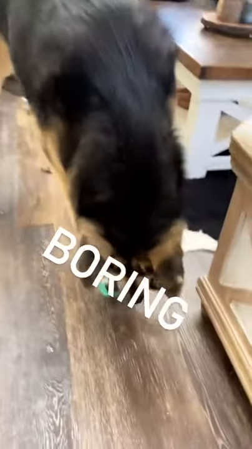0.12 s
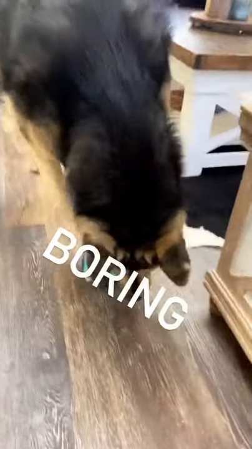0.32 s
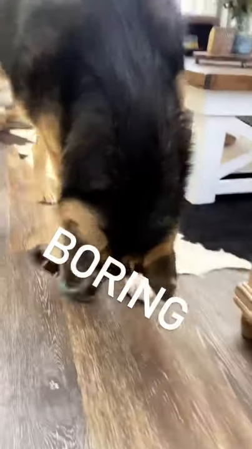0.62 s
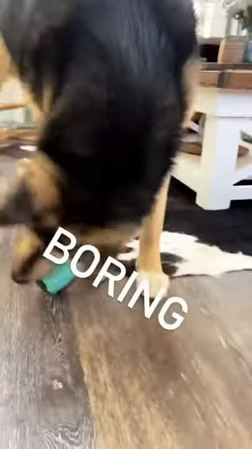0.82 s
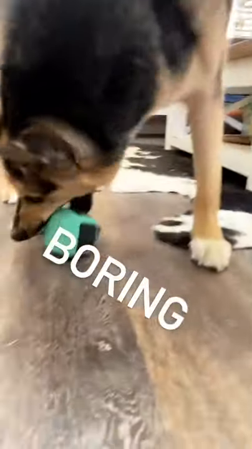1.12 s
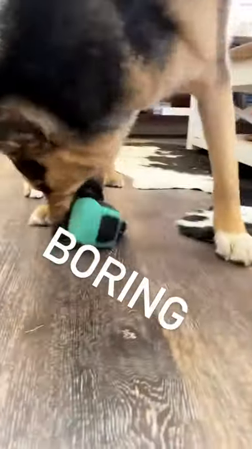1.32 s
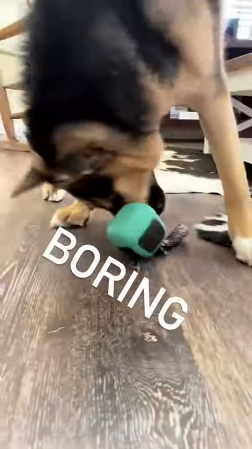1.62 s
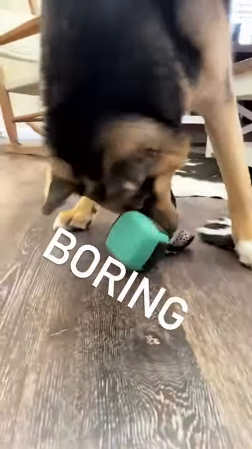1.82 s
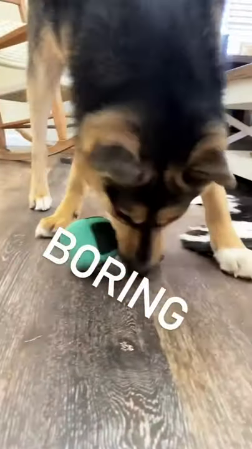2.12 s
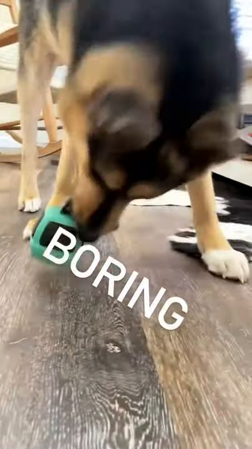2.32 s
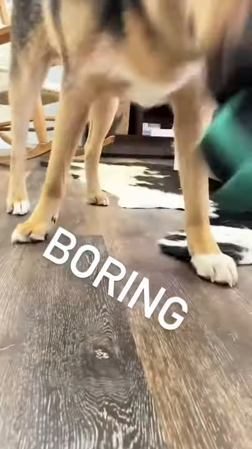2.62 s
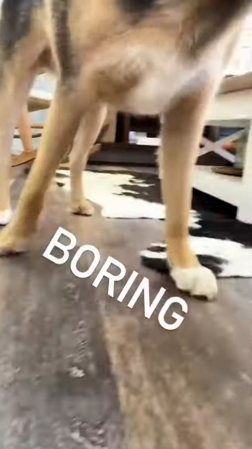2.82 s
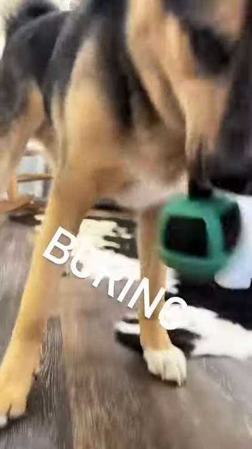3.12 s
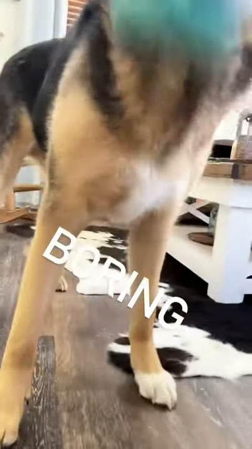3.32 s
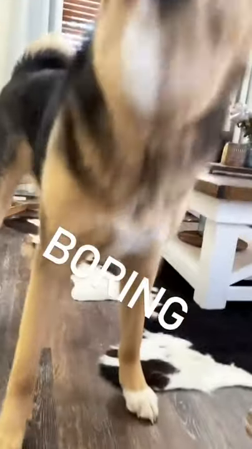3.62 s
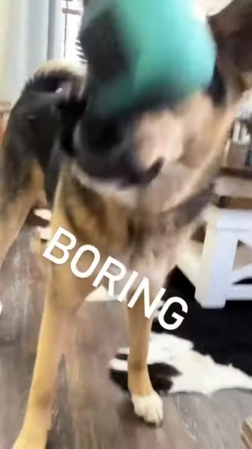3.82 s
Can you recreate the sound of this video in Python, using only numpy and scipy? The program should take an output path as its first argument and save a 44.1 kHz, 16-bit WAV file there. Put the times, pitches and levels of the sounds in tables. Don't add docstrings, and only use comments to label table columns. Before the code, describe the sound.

Hard ticks of a dog's ball and claws on floorboards, low paw thuds, sniffs and breathy pants

```python
import sys
import numpy as np
from scipy import signal
from scipy.fft import rfft, irfft
from scipy.io import wavfile
from scipy.ndimage import uniform_filter1d, map_coordinates

SR = 44100
rng = np.random.default_rng(int(sys.argv[2]) if len(sys.argv) > 2 else 0)


def put_to_file(sound):
    columns = np.atleast_2d(sound).T
    safe = np.clip(columns, -1, 1)
    whole_steps = np.round(safe * 32767)
    wavfile.write(sys.argv[1], SR, whole_steps.astype(np.int16))


def boost(x):
    u = np.asarray(x, float) / 20
    return 10 ** u


N = 174195


def unit(x):
    return x / np.sqrt(np.mean(x ** 2))


def peak(x):
    return x / np.abs(x).max()


def colour(points):
    f = np.maximum(np.fft.rfftfreq(N, 1 / SR), 1)
    p = np.array(points, float)
    db = np.interp(np.log(f), np.log(p[:, 0]), p[:, 1])
    db = db - 24 * np.maximum(np.log2(p[0, 0] / f), 0)
    return unit(irfft(rfft(rng.standard_normal(N)) * boost(db), N))


def ring(x, hz, width_hz):
    return signal.lfilter(*signal.iirpeak(hz, hz / width_hz, fs=SR), x)


def ring_twice(x, hz, width_hz):
    return ring(ring(x, hz, width_hz), hz, width_hz)


def decay(t, t60_s):
    return 1000. ** (-t / t60_s)


def walk(rate_hz):
    hold = int(SR / rate_hz)
    steps = np.repeat(rng.standard_normal(N // hold + 1), hold)
    return unit(uniform_filter1d(uniform_filter1d(steps, hold), hold)[:N])


def swell(start_s, rise_s, fall_s, level_db):
    t = np.arange(N) / SR - start_s
    up = np.clip(t / max(rise_s, 1e-3), 0, 1)
    down = np.clip(1 - (t - rise_s) / max(fall_s, 1e-3), 0, 1)
    return boost(level_db) * (np.sin(np.pi / 2 * up) * np.sin(np.pi / 2 * down)) ** 2.2


def rush(rows, points, grain_db, grain_hz):
    return sum(swell(*row) for row in rows) * colour(points) * boost(grain_db * walk(grain_hz))


def add(out, start_s, x):
    i = max(int(start_s * SR), 0)
    out[i:i + len(x)] += x[:N - i]


def hum():
    # centre_hz, width_hz, level_db
    rumble = [(50.3, 8, -66), (88.8, 26, -58), (155.8, 17.7, -59.5), (174.2, 19, -63.5)]
    mains_hz = 50 * (1 + 0.0044 * walk(0.98))
    line = np.sqrt(2) * np.sin(2 * np.pi * np.cumsum(mains_hz) / SR)
    out = boost(-49.5 + 1.2 * walk(3)) * line
    for hz, width_hz, db in rumble:
        out = out + boost(db) * unit(ring_twice(rng.standard_normal(N), hz, width_hz))
    return out


def room_air():
    # freq_hz, level_db
    air_curve = [(28, -4.5), (70, 5.5), (200, -1.5), (400, -16), (1200, -39), (3000, -47), (7000, -53),
                 (13000, -54)]
    return boost(-56 + 3 * walk(4.3)) * colour(air_curve)


def side_air():
    # freq_hz, level_db
    side_curve = [(36, -26), (65, -3), (160, -1), (250, -11), (500, -24), (1200, -44), (4000, -42),
                  (13000, -46)]
    return boost(-60.5) * colour(side_curve)


def port_hiss():
    # freq_hz, level_db
    hiss_curve = [(7000, -9.5), (10000, -9.5), (11500, -6), (13000, -7)]
    return boost(-88 + 4 * walk(27)) * colour(hiss_curve)


def coat():
    # time_s, level_db
    stir = [(0, -59.5), (.2, -68.5), (.35, -54), (.52, -61.5), (.9, -59), (1.2, -61.5), (1.5, -83),
            (1.62, -80), (1.902, -77), (2.1, -58.5), (2.3, -78.5), (2.58, -76.5), (2.649, -99.5),
            (2.751, -69), (3.05, -62), (3.348, -56), (3.8, -67.5), (3.95, -69)]
    # freq_hz, level_db
    fur_curve = [(200, 5.5), (450, 3.5), (1000, -6), (2400, -4.5), (4500, -6), (6500, -11.5), (9000, -18.5),
                 (13000, -38)]
    # freq_hz, level_db
    hair_curve = [(5000, -9.5), (7500, -7), (10000, 17), (13000, -7)]
    stir_db = np.interp(np.arange(N) / SR, *np.array(stir).T)
    hair_db = -78 + 0.6 * (stir_db - stir_db.mean()) + 5.0 * walk(6.99)
    rustle = boost(stir_db + 2.37 * walk(22)) * colour(fur_curve)
    return rustle + boost(hair_db) * colour(hair_curve)


def scrapes():
    # start_s, rise_s, fall_s, level_db
    drags = [(.0, 0.03, 0.47, -68), (.40, 0.0047, 0.13, -60), (.82, 0.026, 0.048, -42.5),
             (.865, 0.034, 0.045, -48), (1.25, 0.056, 0.42, -68), (1.38, 0.15, 0.12, -78),
             (1.75, 0.04, 0.085, -67), (1.925, 0.016, 0.24, -72), (2.47, 0.046, 0.066, -59.5),
             (2.93, 0.0021, 0.069, -47.5), (2.395, .012, 0.018, -66), (3.12, .04, .1, -63.5),
             (3.31, 0.049, 0.062, -63), (3.43, 0.032, 0.073, -60), (3.86, 0.019, 0.1, -66)]
    # freq_hz, level_db
    drag_curve = [(300, -14), (1100, -2), (2500, -4), (5800, 0), (8000, -4), (10500, -5), (13000, -13)]
    return rush(drags, drag_curve, grain_db=2.5, grain_hz=140)


def ticks():
    # start_s, level_db, ring_hz, contact_s, crack_db (re ring)
    nosing = [(.205, -47, 590, 0.014, -18), (0.218, -41, 500, 0.0087, -16), (0.2668, -23, 1210, 0.0027, -8),
              (0.2683, -29.5, 1100, 0.005, -29), (0.2915, -32.5, 5450, 0.0018, 4.5),
              (0.2921, -30, 1900, 0.002, 9), (.548, -43, 380, .01, -30), (.592, -39.5, 560, 0.0089, -4),
              (0.617, -47.5, 480, 0.0043, -23), (0.9711, -28.5, 2600, 0.0042, -4),
              (0.9722, -34.5, 4840, 0.006, -13), (0.994, -20, 6240, 0.0022, -20.5),
              (0.9965, -25, 5600, 0.0029, -7), (1.002, -21.5, 2900, .004, -10),
              (1.0153, -28, 3600, .002, 3.5), (0.9996, -20, 4300, 0.0036, -1.5),
              (1.0055, -14.5, 5900, 0.0079, -15.5), (1.007, -31, 1514, 0.007, -19),
              (1.01, -23.5, 3900, 0.0021, -2.5), (1.240, -44, 443, 0.0051, -6),
              (1.267, -46, 1580, 0.0091, -8), (1.288, -52, 930, 0.018, -21), (1.566, -55.5, 700, 0.009, -9),
              (1.944, -53.5, 870, 0.0084, -0.5)]
    # start_s, level_db, ring_hz, contact_s, crack_db (re ring)
    swinging = [(2.061, -44, 2140, 0.006, -13), (2.073, -40, 1400, .004, -7), (2.100, -55, 5700, .004, -15),
                (2.126, -32.5, 885, 0.0089, -24), (2.131, -35.5, 1480, 0.0054, -23),
                (2.168, -37, 1410, .003, -14), (2.182, -40, 3620, 0.0022, -21),
                (2.702, -49, 1310, 0.0059, -19), (2.720, -46, 1346, 0.0086, -24),
                (2.753, -49, 1360, .005, -18), (2.765, -40, 1120, 0.0044, -21),
                (2.149, -34.5, 1167, 0.01, -21), (2.408, -39.5, 2010, 0.0036, -10),
                (2.512, -46, 503, 0.005, 8), (2.576, -50.5, 4220, 0.0044, 5.5),
                (2.622, -64, 6060, 0.0026, 2), (2.767, -35, 5800, .008, 1.5),
                (2.927, -32, 5150, 0.0079, -10), (2.9286, -26.5, 6020, 0.0044, 1.5),
                (3.316, -38, 2220, 0.004, -14), (3.334, -37.5, 700, 0.0067, -20),
                (3.362, -31, 990, 0.0089, -14), (3.373, -45, 800, .004, -20),
                (3.385, -40, 1410, 0.0019, -25), (3.454, -47, 850, 0.0033, 1),
                (3.585, -41.5, 334, 0.015, -33)]
    ring_q, overtone_ratio, overtone_db = 2.1, 1.9, -6
    crack_low_hz, crack_top_hz = 1100, 8500
    knock_hz, knock_width_hz = 600, 700
    strike_db = 5

    rows = [*nosing, *swinging]
    out, t = np.zeros(N), np.arange(2048) / SR
    crack_band = signal.butter(2, [crack_low_hz, crack_top_hz], "band", fs=SR)
    chatter = rng.standard_normal((len(rows), 2048))
    for (start_s, db, hz, contact_s, crack_db), rough in zip(rows, chatter):
        burst = rough * np.exp(-2.2 * (t / contact_s) ** 2) * np.minimum(t / (0.18 * contact_s), 1)
        burst[8:11] += boost(strike_db) * np.sign(rough[0])

        overtone_hz = min(overtone_ratio * hz, 0.7 * crack_top_hz)
        body = peak(ring_twice(burst, hz, hz / ring_q))
        body = body + boost(overtone_db) * peak(ring_twice(burst, overtone_hz, overtone_hz / ring_q))
        crack = peak(signal.lfilter(*crack_band, burst))
        knock = peak(ring_twice(burst, knock_hz, knock_width_hz))
        knock_db = -4 - 11 * abs(np.log2(hz / 1200))
        add(out, start_s, boost(db) * (peak(body) + boost(crack_db) * crack + boost(knock_db) * knock))
    return out


def thuds():
    # start_s, level_db, push_s
    pushes = [(0.221, -35, 0.0013), (.27, -34, 0.0096), (.49, -33.5, 0.011), (0.596, -31.5, 0.0014),
              (0.643, -36.5, 0.0088), (.915, -27, 0.0052), (1.021, -32, 0.0089), (1.07, -37.5, 0.0045),
              (1.245, -36, 0.0035), (1.292, -34, 0.0084), (1.919, -40, .004), (2.932, -34.5, 0.0017),
              (3.10, -42, 0.0067), (3.348, -40, 0.0029), (3.641, -38.5, 0.0086)]
    # freq_hz, level_db, t60_s
    boards = [(57.4, 8.5, 0.23), (98.6, 3.5, 0.29), (122.5, 6, 0.25), (152.8, 10, 0.3), (203.7, -2.5, 0.36),
              (285.7, -3, 0.24), (350, -30, .08)]
    mix_spread_db, pitch_spread = 6.4, 0.074
    out, t = np.zeros(N), np.arange(SR // 2) / SR
    spots = rng.standard_normal((len(pushes), 2, len(boards)))
    for (start_s, db, push_s), (mix, detune) in zip(pushes, spots):
        modes = np.zeros(len(t))
        for (hz, mode_db, t60_s), m, d in zip(boards, mix, detune):
            tone = np.sin(2 * np.pi * hz * (1 + pitch_spread * d) * t)
            modes += boost(mode_db + mix_spread_db * m) * tone * decay(t, t60_s)
        hit = signal.fftconvolve(modes, np.hanning(int(push_s * SR) + 3))
        add(out, start_s, boost(db) * peak(hit))
    return out


def sniffs():
    # start_s, rise_s, fall_s, level_db
    draws = [
        (.30, 0.011, 1, -68.5),
        (.50, 0.2, 0.53, -56),
        (.992, 0.0072, 0.031, -32.5),
        (1.01, 0.011, 0.22, -52),
        (3.20, 0.37, 0.37, -53),
    ]
    # freq_hz, level_db
    nose_curve = [(300, -10), (1400, -10.5), (2200, 2.5), (3300, 3.5), (4800, 1), (6500, -8.5), (9000, -32),
                  (13000, -25)]
    return rush(draws, nose_curve, grain_db=1.5, grain_hz=39.75)


def pants():
    # start_s, rise_s, fall_s, level_db, tilt_db_per_octave
    breaths = [
        (.30, 0.015, 0.21, -55, 6.5),
        (.76, 0.019, 0.068, -62, 0),
        (2.018, 0.13, 0.12, -48, 2.4),
        (2.03, 0.022, .09, -61.5, 6.5),
        (2.17, 0.059, .14, -58.5, -0.5),
        (.83, .03, 0.074, -54.5, 0.5),
        (2.50, 0.082, 0.085, -68.5, -0.5),
        (2.671, 0.054, 0.09, -51, 1.5),
        (2.719, 0.048, .07, -52, 3),
        (2.84, 0.043, 0.21, -59.5, 0),
    ]
    # centre_hz, width_hz, level_db
    throat = [(277, 26, -3.5), (414, 25, -0.5), (700, 240, -1), (1060, 130, -2), (1300, 84, -2.5),
              (2010, 490, -3.5), (2660, 730, -4.5), (3170, 1330, -7), (6200, 1800, -13)]
    breath = rng.standard_normal(N) * boost(2.5 * walk(300))
    breath = signal.lfilter(*signal.butter(4, 7000, fs=SR), breath)
    bands = []
    for k, (hz, width_hz, db) in enumerate(throat):
        gain = (-1) ** k * boost(db + 3.2 * walk(40))
        bands.append(gain * ring(breath, hz, width_hz) / np.sqrt(width_hz / 200))

    out = np.zeros(N)
    for start_s, rise_s, fall_s, db, tilt_db in breaths:
        voiced = sum(boost(tilt_db * np.log2(row[0] / 1000)) * band for row, band in zip(throat, bands))
        out += swell(start_s, rise_s, fall_s, db) * unit(voiced)
    return out


def tags():
    # start_s, level_db
    clinks = [
        (.972, -49),
        (.999, -39),
        (1.005, -45.5),
        (1.040, -45.5),
    ]
    # freq_hz, level_db, t60_s
    tag_modes = [(2468, -6, .14), (2962, -9, .14), (3350, -8, .15), (4019, -2, .12), (4410, 0, .1),
                 (5012, -8, .15), (5860, -4, .05), (6030, -8, .04)]
    mix_spread_db = 4.6
    out, t = np.zeros(N), np.arange(SR // 4) / SR
    mixes = rng.standard_normal((len(clinks), len(tag_modes)))
    for (start_s, db), mix in zip(clinks, mixes):
        for (hz, mode_db, t60_s), m in zip(tag_modes, mix):
            level = boost(db + mode_db + mix_spread_db * m)
            add(out, start_s, level * np.sin(2 * np.pi * hz * t) * decay(t, t60_s))
    return out


def wheezes():
    # start_s, rise_s, fall_s, level_db
    breaths = [
        (2.30, 0.059, 0.098, -62.5),
        (3.11, 0.062, 0.15, -52.5),
        (2.38, 0.071, 0.087, -72),
    ]
    # freq_hz, level_db
    jaw_curve = [(400, 1.5), (700, -1.5), (1350, -0.5), (2000, 6), (2900, -2.5), (6000, -36), (13000, -47)]
    return rush(breaths, jaw_curve, grain_db=3.2, grain_hz=60)


def room_echo(near):
    t60_s, low_hz, top_hz, level_db = 0.22, 200, 5500, -12
    t = np.arange(SR // 2) / SR
    tails = rng.standard_normal((2, len(t))) * decay(t, t60_s) * np.minimum(t / 0.0029, 1)
    tails = signal.lfilter(*signal.butter(2, [low_hz, top_hz], "band", fs=SR), tails)
    tails = tails / np.sqrt(np.sum(tails ** 2, axis=1, keepdims=True))
    return boost(level_db) * signal.fftconvolve(near[None], tails, axes=1)[:, :N]


def far_port(front):
    lag_s = 4.9e-5 + 0.7e-5 * walk(5)
    return map_coordinates(front, [np.arange(N) - lag_s * SR], order=5, mode="mirror")


def scene():
    near = ticks() + pants() + sniffs() + scrapes() + coat() + tags() + wheezes()
    front = near + thuds() + hum() + room_air()
    ports = np.array([front, far_port(front)])
    opposed = side_air() - boost(-11) * thuds()
    side = opposed * np.array([[1], [-1]])
    hiss = np.array([port_hiss(), port_hiss()])
    return ports + room_echo(near) + side + hiss


def top_cut(x):
    return signal.sosfilt(signal.butter(12, 14480, fs=SR, output="sos"), x)


def record(dry):
    low_hz, top_hz = 36, 13150
    cut = signal.sosfilt(signal.butter(3, low_hz, "high", fs=SR, output="sos"), dry)
    cut = signal.sosfilt(signal.ellip(10, 0.2, 45, top_hz, fs=SR, output="sos"), cut)
    return top_cut(cut)


dry = scene()
out = record(dry)
put_to_file(out)
```